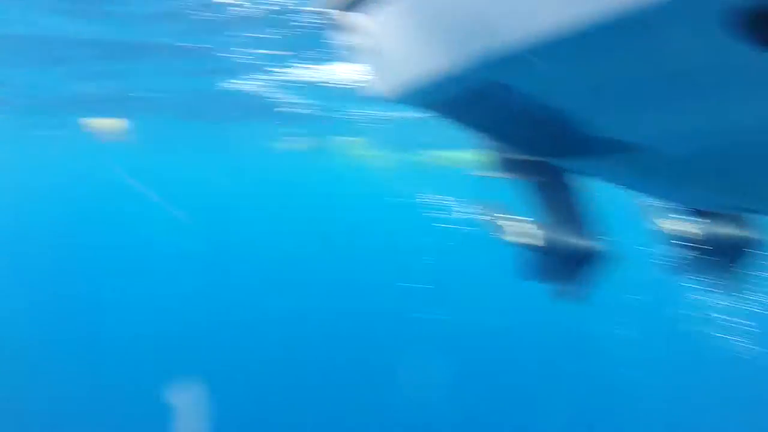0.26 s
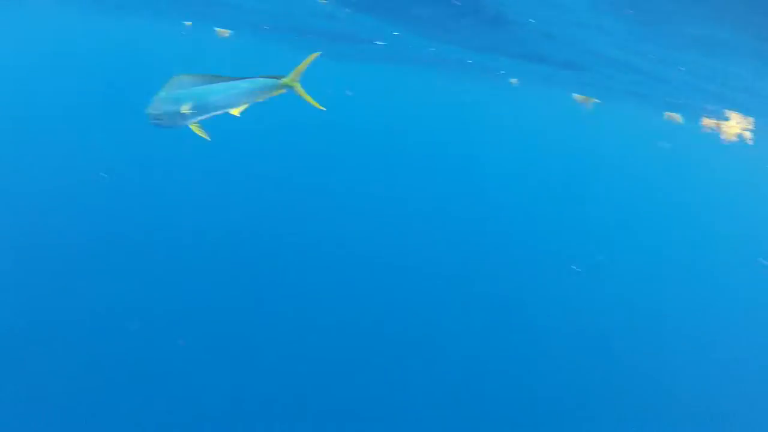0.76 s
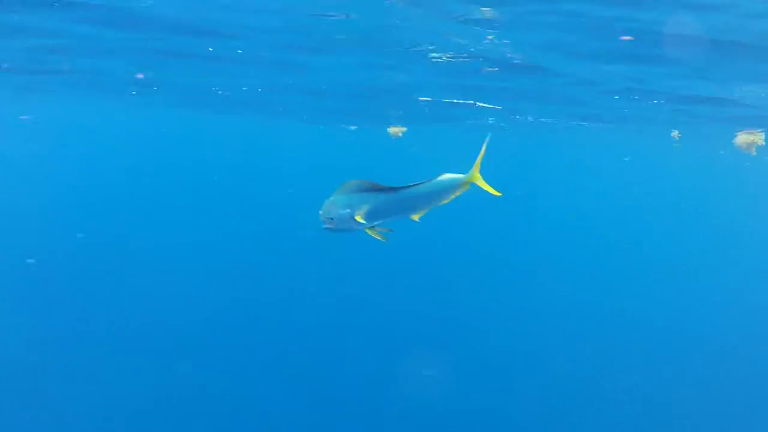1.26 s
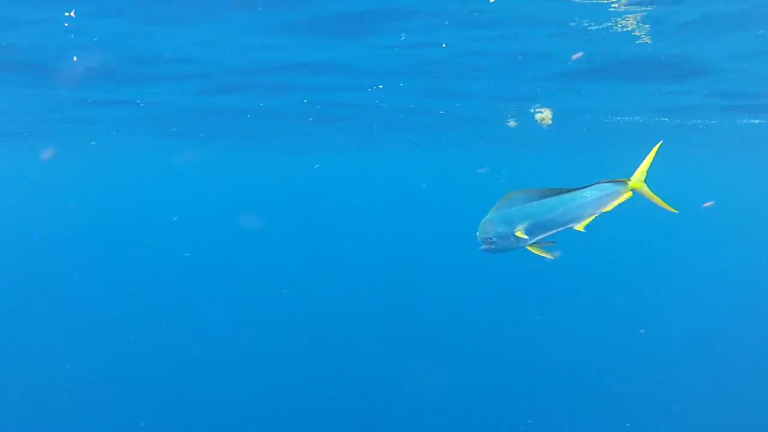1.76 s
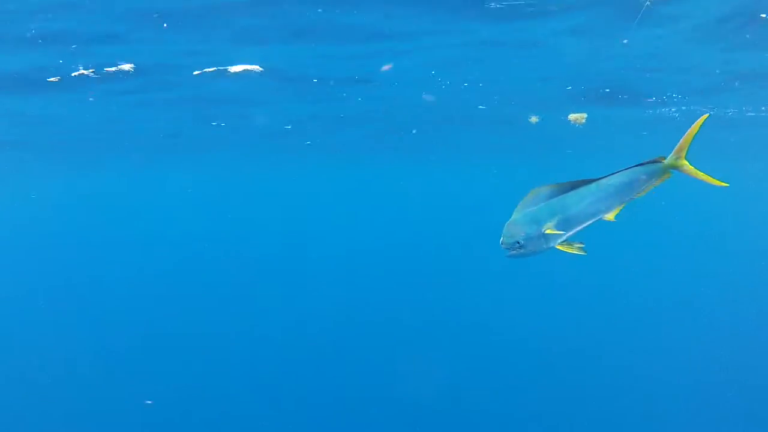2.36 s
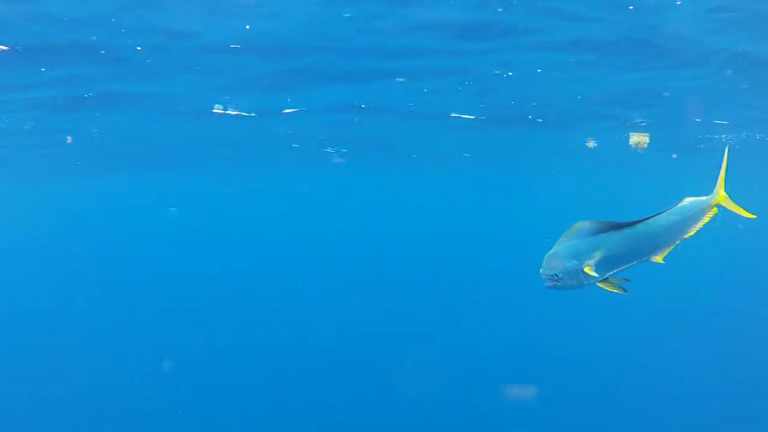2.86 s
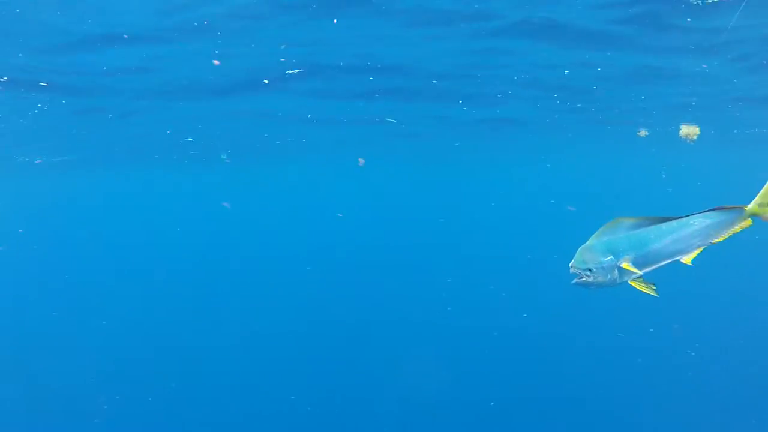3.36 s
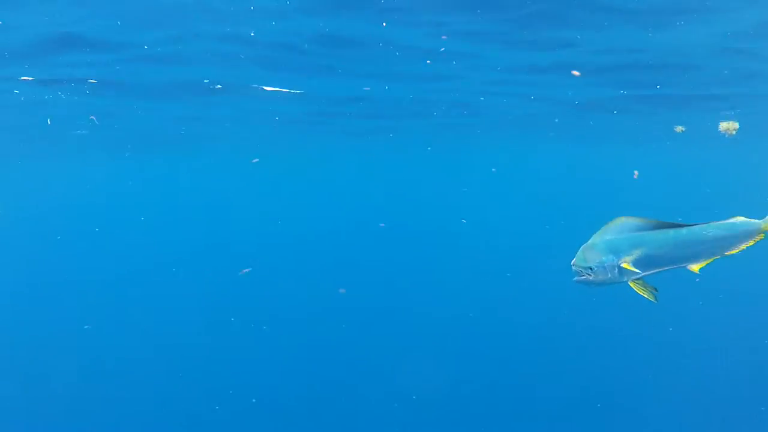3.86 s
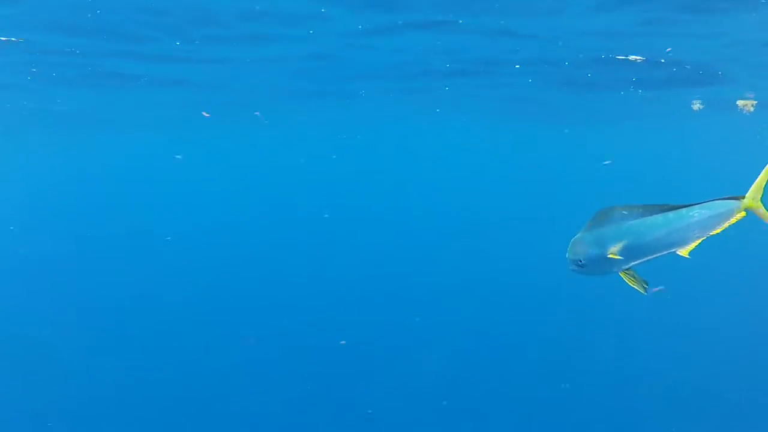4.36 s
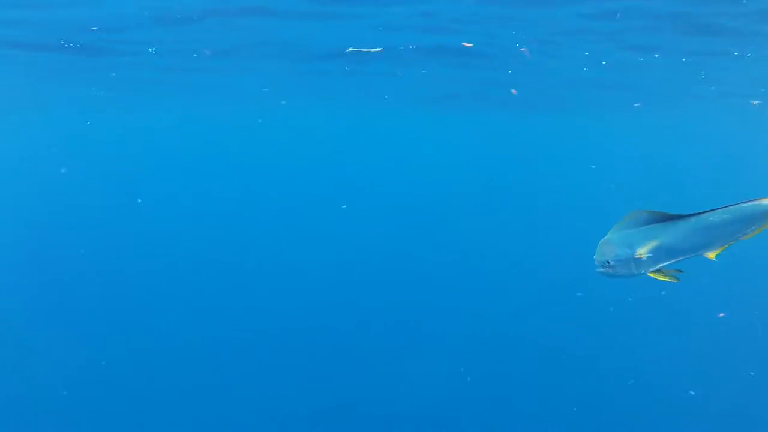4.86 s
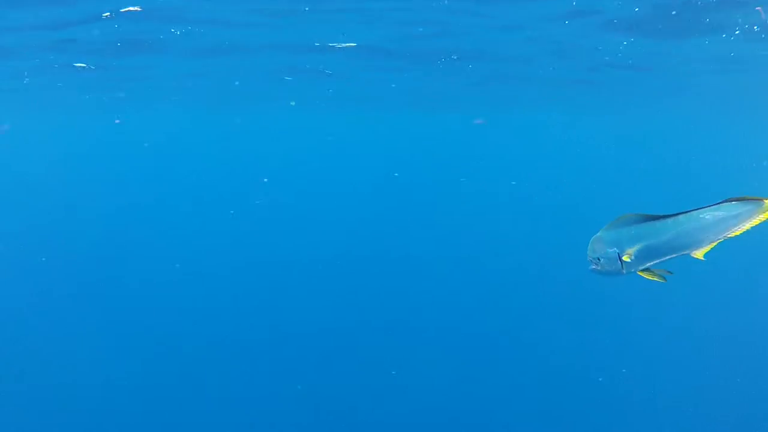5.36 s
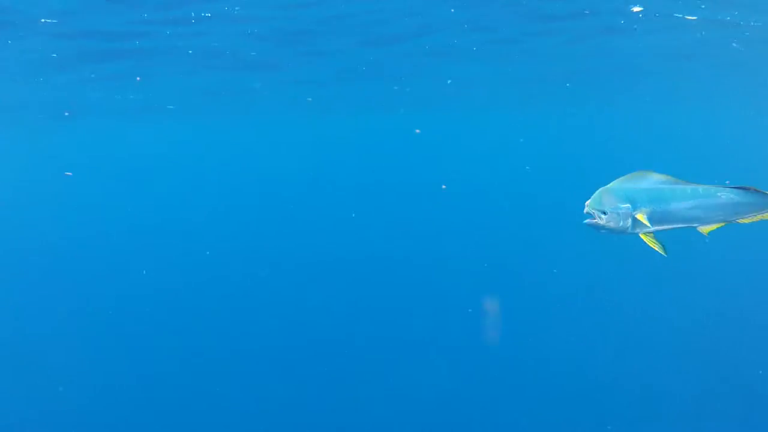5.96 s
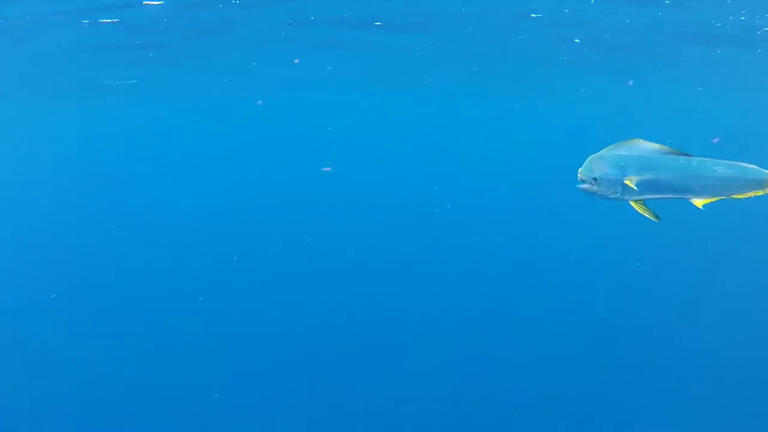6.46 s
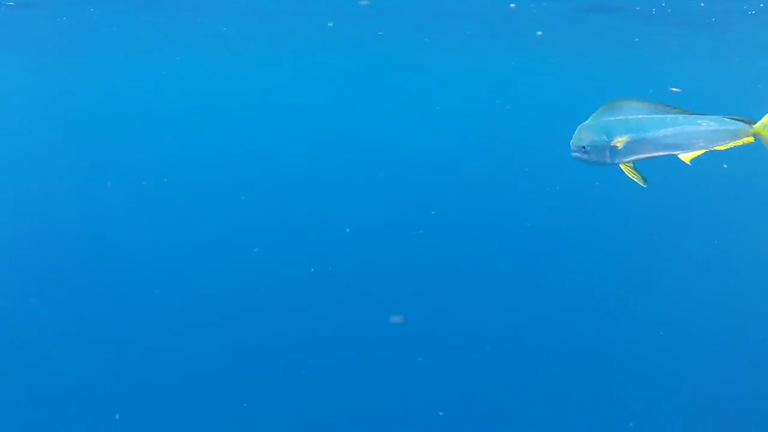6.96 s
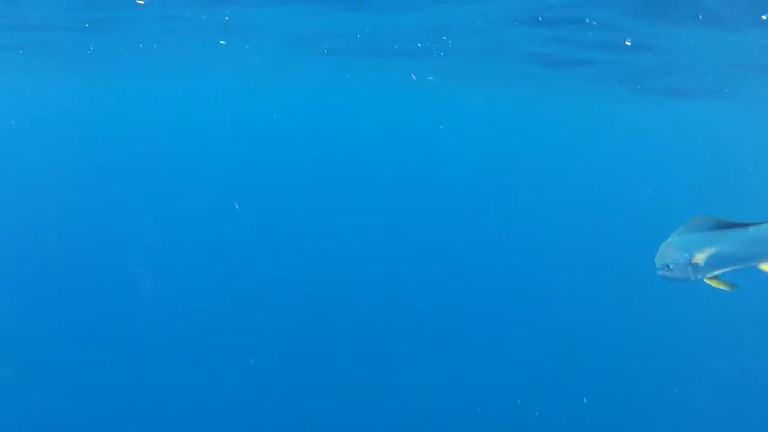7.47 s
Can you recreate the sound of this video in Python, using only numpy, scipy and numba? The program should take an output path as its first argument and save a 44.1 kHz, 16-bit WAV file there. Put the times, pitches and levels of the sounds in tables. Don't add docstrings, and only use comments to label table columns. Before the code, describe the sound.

A rough, close, slightly clipped underwater capture with gritty mirrored treble. Water shoves the pole in deep booming bursts and the clamp groans; the shell bangs and clicks, spray and froth fizz. Bubbles glug out over the next second and thin away. The open sea remains as a steady dull hiss with soft hollow swells, before the pole stirs again and the housing knocks sharply.

```python
import sys
import numpy as np
from scipy import signal
from scipy.fft import rfft, irfft
from scipy.io import wavfile
from scipy.ndimage import uniform_filter1d
from numba import njit

SR = 44100
rng = np.random.default_rng(int(sys.argv[2]) if len(sys.argv) > 2 else 0)


def pcm_store(signal):
    levels = np.round(np.clip(np.atleast_2d(signal), -1, 1) * 32767)
    wavfile.write(sys.argv[1], SR, levels.astype(np.int16).T)


def level_to_linear(level):
    exponent = np.asarray(level, float) / 20
    return 10 ** exponent


N = 340452


def unit(x):
    return x / np.sqrt(np.mean(x ** 2))


def lowpass(x, order, hz):
    return signal.sosfilt(signal.butter(order, hz, fs=SR, output="sos"), x)


def curves(table):
    s, *columns = np.transpose(table)
    t = np.arange(N) / SR
    gate = np.interp(t, [s[0] - 0.03, s[0], s[-1], s[-1] + 0.05], [0, 1, 1, 0])
    return gate, [np.interp(t, s, column) for column in columns]


def walk(rate):
    hold = int(SR / rate)
    steps = np.repeat(rng.standard_normal(N // hold + 1), hold)
    return 1.77 * uniform_filter1d(uniform_filter1d(steps, hold), hold)[:N]


def resonant(x, modes):
    f = np.fft.rfftfreq(N, 1 / SR)
    power = sum(level_to_linear(2 * db) / (1 + (2 * (f - hz) / width) ** 2) ** 2 for hz, width, db in modes)
    return unit(irfft(rfft(x) * np.sqrt(power), N))


@njit
def svf(x, hz, width):
    y, band, low = np.empty(len(x)), 0., 0.
    for i in range(len(x)):
        g, k = np.tan(np.pi * hz[i] / SR), width / hz[i]
        v = (band + g * (x[i] - low)) / (1 + g * (g + k))
        band = 2 * v - band
        low = low + 2 * g * v
        y[i] = k * v
    return y


@njit
def rings(s, size, hz, t60, rise, glide):
    out = np.zeros(N)
    for e in range(len(s)):
        start, length, phase = int(s[e] * SR), int(t60[e] * SR), 0.
        for i in range(max(start, 0), min(start + length, N)):
            age = (i - start) / SR
            phase += 2 * np.pi * hz[e] * (1 + glide * age / t60[e]) / SR
            swell = min(age * hz[e] / rise, 1.)
            out[i] += size[e] * swell * 1000. ** (-age / t60[e]) * np.sin(phase)
    return out


def bubble_cloud(count, lo_hz, hi_hz, cycles, scatter_db, glide):
    when, pitch, strength = rng.random((count, 3)).T
    hz = lo_hz * (hi_hz / lo_hz) ** pitch
    size = level_to_linear(scatter_db * np.minimum(-np.log(1 - strength), 3.2))
    return unit(rings(when * N / SR, size, hz, cycles / hz, 5.3, glide))


def fizz(table, gain_db, dull_hz, scatter_db, count):
    gate, columns = curves(table)
    crackle = bubble_cloud(count, lo_hz=780, hi_hz=4600, cycles=28, scatter_db=scatter_db, glide=0.1)
    return gate * level_to_linear(columns[-1] + gain_db) * unit(lowpass(crackle, 3, dull_hz))


def fading(table, fade_s, longer=0):
    return [(s, db, hz, fade_s * level_to_linear(-longer * db)) for s, db, hz in table]


def hits(table, ring_s, rise, spread, rattle_db, crack_db, crack_width, count, snap_db=-60):
    s, peak_db, hz, fade = np.transpose(table)
    ring = np.clip(fade, 0.008, ring_s)
    out = rings(s, level_to_linear(peak_db + 3.5), hz, ring, rise, 0.02)

    chance = np.clip(rng.standard_normal((len(s), count, 2)), -1.4, 1.4)
    late = rng.random((len(s), count)) ** 1.3
    for k in range(count):
        near_hz = np.clip(hz * np.exp(spread * chance[:, k, 0]), 60, 5400)
        near_db = peak_db + rattle_db + 3.5 * chance[:, k, 1] - 12 * late[:, k]
        near_db = near_db - 20 * np.maximum(np.log2(near_hz / 4000), 0)
        near_s = s + 0.33 * np.clip(fade, 0, 0.08) * late[:, k]
        out = out + rings(near_s, level_to_linear(near_db), near_hz, 0.74 * ring, rise, 0.02)

    start = (s * SR).astype(int)
    blows = np.zeros(N)
    blows[start] = level_to_linear(peak_db + crack_db)
    latest = np.maximum(np.searchsorted(start, np.arange(N), "right") - 1, 0)
    latest_hz = hz[latest]

    def noise_burst(decay_s):
        return signal.lfilter([1], [1, -np.exp(-1 / (decay_s * SR))], blows) * rng.standard_normal(N)

    crack = svf(svf(noise_burst(0.0033), latest_hz, crack_width), latest_hz, crack_width)
    snap = svf(noise_burst(0.0012), latest_hz, 2600.)
    return out + level_to_linear(snap_db - crack_db) * snap + crack * np.sqrt(SR / crack_width)


# peak time in seconds, pole
# shudder in dB, clamp groan in dB, time to fall 20 dB in seconds.
WATER_SHOVES = [(0.01, -34, -47, 0.5), (0.215, -17, -24, .2), (0.245, -9, -23.5, 0.1),
                (0.355, -15, -18, 0.05), (0.465, -11.5, -22, 0.27), (0.525, -9, -19, 0.19),
                (0.575, -1, -29, 0.12), (0.679, -6.5, -37, 0.17), (0.79, -12.5, -51, .2),
                (0.9, -14, -41, 0.27), (0.985, -28, -21.5, 0.13), (1.145, -20, -32, 0.81),
                (1.66, -24.5, -29, 0.2), (1.75, -34, -33, 0.18), (1.88, -26, -43, .14),
                (2.02, -24.5, -32.5, 0.16), (2.14, -25.5, -51.5, 0.86), (2.38, -28, -63, 0.67),
                (2.57, -22, -62, 0.38), (3.42, -33, -66, 0.7), (4.03, -37, -66, 0.5),
                (4.925, -31.5, -58, 0.2), (5.275, -39, -65, 0), (6.6, -37.5, -64, 1.5),
                (7.265, -30, -55, .08), (7.37, -27, -37, 0.2), (7.5, -19, -33, 0.14), (7.6, -25, -40, .3),
                (7.676, -30, -24, 0)]


def jolted(column, stretch, calm_db):
    t, power = np.arange(N) / SR, level_to_linear(2 * calm_db)
    rise_s = 0.064
    for row in WATER_SHOVES:
        age = t - row[0]
        slope = np.maximum(age / (stretch * row[-1]), -age / rise_s)
        power = power + level_to_linear(2 * (row[column] - 20 * slope))
    return 10 * np.log10(power)


def pole():
    shudder_db = jolted(column=1, stretch=0.96, calm_db=-42)
    groan_db = jolted(column=2, stretch=0.73, calm_db=-64.5)
    eddies = rng.standard_normal((3, N))
    bend = resonant(eddies[0], [(55.1, 14, 0)])
    bend = unit(bend / (0.49 + np.abs(signal.hilbert(bend))) ** 0.62)
    rest = resonant(eddies[1], [(82.8, 20, 3.5), (27, 9, -1.5)])
    groan = resonant(eddies[2], [(223.8, 32, 0), (255.0, 53, -2.0), (135.6, 35, -5)])
    groan = groan * level_to_linear(1.95 * walk(25))
    return level_to_linear(shudder_db) * (bend + level_to_linear(-8.5) * rest) + level_to_linear(groan_db) * groan


# start in seconds, peak level in dB, ring in Hz.
SHELL_KNOCKS = [(0.0525, -29, 600), (0.2072, -19.5, 534), (0.311, -14.5, 520), (0.3231, -6, 474),
                (0.3351, -8.5, 500), (0.345, -13, 540), (0.3613, 0, 581), (0.3782, -16, 600),
                (0.4475, -9.5, 566), (0.4905, -17, 524), (0.5688, -17, 570), (0.9326, -24.5, 600),
                (0.9744, -6.5, 640), (0.9902, 5.5, 600), (1.0066, -8.5, 500), (1.0666, -18, 484),
                (1.1388, -20, 600), (1.1685, -7, 573), (1.1878, 0, 540), (1.2021, -17, 584),
                (1.2713, -14.5, 626), (1.35, -23, 520), (1.3733, -13.5, 575), (1.3985, -14, 480),
                (1.6259, -20.5, 493), (1.655, -17, 508), (1.6778, -17, 527), (1.72, -18, 554),
                (1.7417, -12, 568), (1.7861, -20.5, 561), (1.815, -25, 560), (1.852, -30, 568),
                (1.885, -29, 572), (1.914, -24, 578), (1.961, -25.5, 590), (2.0316, -25, 600),
                (2.0677, -18, 608), (2.128, -34, 640), (2.2, -38, 752), (7.6685, -9, 480)]


def knocks():
    blows = fading(SHELL_KNOCKS, fade_s=0.0251, longer=0.42)
    return hits(blows, ring_s=0.092, rise=1.33, spread=0.477, rattle_db=-22.0,
                crack_db=-34, crack_width=390.0, count=3)


# start in seconds, peak level in dB, ring in Hz.
SINKING_TICKS = [(0.0983, -18.5, 2200), (0.1083, -22.5, 1770), (0.1367, -27, 1940), (0.2065, -14.5, 2500),
                 (0.2883, -23, 2000), (0.309, -7, 2250), (0.3237, -27, 1340), (0.3345, -16, 1360),
                 (0.3423, -21, 1370), (0.3502, -11, 1350), (0.3609, -3.5, 1350), (0.3741, -9.5, 2490),
                 (0.3832, -2.5, 2310), (0.394, -30, 1600), (0.4069, -19, 3900), (0.416, -29.5, 1900),
                 (0.4318, -27.5, 2326), (0.4411, -25.5, 2580), (0.4511, -23, 1640), (0.458, -20, 1574),
                 (0.5636, -36, 1500), (0.6652, -25, 1740), (0.8251, -19.5, 1575), (0.9034, -17.5, 1810),
                 (0.9727, -27.5, 2010)]
# start in seconds, peak level in dB, ring in Hz, fade time in seconds.
CLAMP_TICKS = [(7.4482, -34, 2310, 0.004), (7.5326, -23.5, 3240, 0.013), (7.5698, -22, 3830, 0.013),
               (7.6149, -27, 3500, .008), (7.616, -25, 1470, 0.012), (7.622, -15.5, 3800, 0.014),
               (7.623, -33, 1400, 0.019), (7.6673, -2, 2300, 0.00535), (7.6734, -21, 3720, 0.019),
               (7.6784, -15, 2000, 0.013), (7.6802, -17, 3470, 0.017), (7.6998, -30, 1940, 0.01)]


def plastic_ticks():
    ticks = fading(SINKING_TICKS, fade_s=0.017) + CLAMP_TICKS
    return hits(ticks, ring_s=0.027, rise=1.26, spread=0.27, rattle_db=-12,
                crack_db=-13.5, crack_width=900.0, count=5, snap_db=-12)


# time in seconds, pitch of the pocket in Hz, level in dB.
AIR_POCKET = [
    (0.98, 552, -21),
    (1.104, 490, -29.5),
    (1.19, 468, -21),
    (1.33, 448, -38),
    (1.47, 504, -27.5),
    (1.59, 505, -39),
    (1.73, 547, -22.5),
    (1.92, 569.5, -29.5),
    (2.2, 654, -54),
]


def pocket():
    gate, (hz, level_db) = curves(AIR_POCKET)
    pops = rng.standard_normal(N) * level_to_linear(3.2 * walk(60.03))
    hz = hz * (1 + 0.015 * walk(14))

    def sing(ratio, width):
        return unit(svf(svf(pops, ratio * hz, width), ratio * hz, 4.0 * width))

    upper_modes = [(1.3, -27), (1.55, -12.5), (1.9, -17.5), (2.7, -14)]
    upper = sum(level_to_linear(db) * sing(ratio, 35.0) for ratio, db in upper_modes)
    return gate * level_to_linear(level_db - 3.0) * (sing(0.98, 15.0) + upper)


# start in seconds, peak level in dB, ring in Hz.
SQUEEZE_TICKS = [(0.9891, -18, 1195), (1.042, -30.5, 2280), (1.0572, -29.5, 1930), (1.085, -28, 1250),
                 (1.1009, -18, 1320), (1.1036, -15.5, 1420), (1.1124, -22.5, 1393), (1.1462, -22.5, 1810),
                 (1.1525, -23, 1950), (1.1675, -17.5, 2282), (1.1873, -12.5, 3470), (1.2008, -24, 1900),
                 (1.217, -23.5, 2400), (1.23, -26.5, 1290), (1.2426, -21.5, 1380), (1.2588, -27, 1374),
                 (1.277, -22, 1390), (1.3086, -28, 1370), (1.3258, -13.5, 1530), (1.3571, -21.5, 1220),
                 (1.371, -21.5, 1480), (1.3989, -25, 1550), (1.4527, -24, 1280), (1.4676, -22.5, 1390),
                 (1.4933, -26.5, 1500), (1.567, -29.5, 1280), (1.588, -32, 1470), (1.631, -27.5, 2365),
                 (1.6849, -27, 1339), (1.71, -30, 1400), (1.7417, -25.5, 1280), (1.7865, -27, 2020),
                 (1.891, -32, 1490), (1.9141, -21.5, 1480), (1.945, -31, 1350), (1.9614, -20, 1330),
                 (2.0359, -30, 1333), (2.0676, -28, 1740), (2.069, -29, 2250), (2.117, -39, 1650),
                 (2.227, -37, 1290), (2.245, -37, 1500)]


def squeeze_ticks():
    return hits(fading(SQUEEZE_TICKS, fade_s=0.027), ring_s=0.03, rise=1.5, spread=0.3, rattle_db=-9,
                crack_db=-12.5, crack_width=730.0, count=7, snap_db=-20)


# start in seconds, peak level in dB, ring
# in Hz, fade time in seconds.
SINGLE_RINGS = [(.293, -29.5, 5200, .012), (.456, -19, 400.4, .2), (.5, -21, 396, .19),
                (.933, -25, 1030, 0.048), (1.03, -23.5, 444, .15), (1.205, -19, 429, 0.13),
                (1.225, -22.5, 645, 0.17), (1.326, -16.5, 1257, .05), (1.63, -25.5, 980, 0.044),
                (1.709, -15, 552, 0.13), (1.84, -34, 864, .17), (1.868, -42.5, 4500, .013),
                (1.97, -33.5, 2800, .015), (2.068, -25, 960, 0.0316), (2.145, -49, 3950, .012),
                (7.476, -32.5, 860, 0.02), (7.668, -12, 1690, 0.025), (7.682, -18, 600, .03),
                (7.69, -24, 400, .06), (1.008, -22, 400, .1), (1.135, -18, 520, .06),
                (1.18, -15.5, 400, .06), (1.283, -20, 690, .05), (1.06, -29, 950, .1)]


def single_rings():
    return hits(SINGLE_RINGS, ring_s=0.2, rise=1.6, spread=0.184, rattle_db=-4.5,
                crack_db=-25, crack_width=720.0, count=2)


# time in seconds, fizz level in dB.
AIR_FROTH = [
    (0.98, -41.5),
    (1.104, -34),
    (1.35, -36.5),
    (1.55, -43),
    (1.7, -45.5),
    (1.95, -46),
    (2.1, -54),
    (2.25, -56),
    (2.4, -62),
]


def froth():
    return fizz(AIR_FROTH, gain_db=0.0, dull_hz=1900., scatter_db=4.5, count=5000)


# time in seconds, fizz level in dB.
PLUNGE_FOAM = [
    (0.205, -50),
    (0.216, -33),
    (0.254, -55.5),
    (0.364, -24),
    (0.385, -29),
    (0.392, -50),
    (0.44, -48),
    (0.455, -31),
    (0.56, -38),
    (0.68, -53),
]


def foam():
    return fizz(PLUNGE_FOAM, gain_db=2.5, dull_hz=1200., scatter_db=5.5, count=9000)


# start in seconds, length in seconds, level in dB, brightness in Hz.
SPRAY_SHEETS = [(0.302, 0.027, -30, 1502), (0.37, 0.0284, -31, 3000), (0.398, 0.099, -40, 3500),
                (1.138, 0.0204, -38.5, 2020), (1.159, 0.02, -24.5, 4040), (1.173, 0.018, -23.5, 4510),
                (1.218, 0.037, -32, 2535), (7.667, 0.013, -19.5, 3200), (0.454, 0.0517, -33, 1200),
                (0.534, 0.041, -29.5, 1200), (7.6148, 0.0038, -27, 3300), (7.69, .014, -41, 2600),
                (1.1, 0.011, -31, 3190), (1.033, 0.036, -38, 2400), (1.629, 0.013, -38, 1800),
                (2.033, .012, -43, 2400), (2.065, 0.013, -39, 1900)]


def spray():
    t, out = np.arange(N) / SR, 0
    drops = bubble_cloud(12000, lo_hz=500, hi_hz=5800, cycles=11.8, scatter_db=2.5, glide=-0.052)
    for s, length, db, hz in SPRAY_SHEETS:
        corners = s + length * np.array([0, 0.08, 0.8, 1.5])
        gate = np.interp(t, corners, [0.0016, 0.91, 0.97, 0.0015])
        out = out + gate * level_to_linear(db) * unit(lowpass(drops, 2, hz))
    return out


# start in seconds, peak level in dB, ring in Hz, fade time in seconds.
HIGH_PINGS = [(0.1371, -35.5, 3640, 0.0265), (0.2882, -23, 3133, 0.0115), (0.2931, -29.5, 3250, 0.011),
              (0.3605, -24, 3620, 0.019), (0.3732, -26, 3490.0, 0.044), (0.3831, -24, 3870, 0.0088),
              (0.4143, -20.5, 3160, 0.0095), (0.4261, -33.5, 4480, 0.014), (0.4472, -28, 3200, 0.011),
              (0.4573, -30.5, 4600, 0.016), (0.5002, -30, 4330, 0.017), (0.9032, -29.5, 3685, 0.018),
              (0.9911, -28, 3030, 0.012), (1.1179, -30.5, 3300, 0.017), (1.1688, -17.5, 3772, 0.036),
              (1.5635, -38, 3830, 0.012), (2.0287, -39, 3150, 0.01), (2.0668, -39, 3374, 0.013),
              (7.4484, -31, 3665, 0.0082), (7.67, -28, 5200, .02), (0.716, -44, 5200, 0.0092),
              (0.841, -41, 5200, .012), (0.8842, -34, 3900, 0.012), (0.944, -42, 3330, .01),
              (0.9655, -41, 3000, .01), (1.1002, -24, 2820, 0.02), (1.2289, -37, 3500, .014),
              (1.2753, -35.5, 3500, .014), (1.3042, -32, 2850, 0.02), (1.7442, -39.5, 3580, 0.015),
              (1.903, -45.5, 3500, .012), (2.2, -48, 3600, .01), (2.2, -52, 5400, .01)]


def pings():
    return hits(HIGH_PINGS, ring_s=0.02, rise=3.6, spread=0.27, rattle_db=-6,
                crack_db=-15.5, crack_width=3000.0, count=2)


# start in seconds, peak
# level in dB, ring in Hz, fade time in seconds.
POLE_THUMPS = [(.334, -26, 178.6, 0.062), (.981, -22.5, 124, 0.048), (2.003, -25, 130, 0.072),
               (.33, -17, 86, 0.13), (.65, -17, 82, 0.21), (1.245, -19.5, 90, 0.16), (1.43, -28, 88, .15),
               (1.67, -23, 80, 0.21), (2.008, -25, 88, .15), (4.918, -41.5, 120, 0.04),
               (5.912, -36, 250, .04), (7.361, -27, 127, 0.074), (7.486, -32, 142, 0.092)]


def thumps():
    return hits(POLE_THUMPS, ring_s=0.22, rise=0.59, spread=0.28, rattle_db=-8,
                crack_db=-23, crack_width=150., count=3)


# start in seconds, peak level in dB, ring in Hz, fade time in seconds.
FAR_GULPS = [(3.0949, -27, 476, 0.047), (3.4293, -27.5, 500.0, 0.1), (3.6022, -27, 496, 0.051),
             (3.7926, -33.5, 500.0, 0.118), (3.9782, -28.5, 555, 0.041), (5.1567, -29.5, 467, 0.092),
             (5.5127, -33, 480.0, 0.11), (5.9126, -26.5, 600.0, 0.037), (6.2604, -27, 580, 0.0389),
             (6.4817, -25.5, 600.0, 0.065), (6.6053, -27, 532, 0.027), (7.2087, -23, 478, 0.029),
             (7.4757, -16, 540, 0.021)]


def gulps():
    return hits(FAR_GULPS, ring_s=0.0935, rise=2.9, spread=0.148, rattle_db=-15.5,
                crack_db=-39, crack_width=180.0, count=2)


# peak time in seconds, half length in seconds, lift of the lowest hollow mode in dB.
SEA_SWELLS = [
    (0.297, 0.2, 14),
    (0.75, 0.18, 3.5),
    (1.148, .15, 4.5),
    (2.502, 0.28, 4.5),
    (3.506, 0.56, 12.5),
    (5.453, 0.5, 12.5),
    (7.413, 0.51, 11.5),
]
# time in seconds, level in dB.
HOLLOW_STIR = [(0.0, -43), (0.38, -34), (0.395, -52), (0.44, -51), (0.452, -32), (0.66, -38), (0.75, -47),
               (0.99, -42), (1.14, -24.5), (1.27, -33.5), (1.44, -39.5), (1.87, -57)]


def lapping():
    t = np.arange(N) / SR
    swell_db = sum(db * np.exp(-((t - s) / half) ** 2) for s, half, db in SEA_SWELLS)
    gate, (stir_db,) = curves(HOLLOW_STIR)
    swell_share = 0.243
    upper = level_to_linear(2 * (-48.5 + swell_share * swell_db)) + gate * level_to_linear(2 * stir_db)
    return 10 * np.log10(upper), -61.5 + swell_db


# centre in Hz, width in Hz, level in dB.
HOLLOW_MODES = [
    (480, 134, -0.5),
    (600, 95, 2.5),
]


def slosh():
    level_db, lowest_db = lapping()
    blobs = bubble_cloud(900, lo_hz=323.7, hi_hz=701, cycles=19.0, scatter_db=3.0, glide=0.036)
    rush = rng.standard_normal((2, N)) * level_to_linear(1.03 * walk(30))
    upper = resonant(rush[0], HOLLOW_MODES) + level_to_linear(-7.5) * resonant(blobs, HOLLOW_MODES)
    lowest = resonant(rush[1], [(333.0, 66, 0)])
    return level_to_linear(level_db + 0.5) * upper + level_to_linear(lowest_db - 3.0) * lowest


# centre in Hz, width in Hz, level in dB.
WALL_MODES = [(165, 165, -2.5), (826.4, 55, -14), (994.3, 40, -9), (1304, 146.3, -2.5), (1486, 230, -0.5),
              (1961, 222, 1), (2095, 213, -2), (2482, 140, -7), (2696, 120, -11), (2864, 340, -17),
              (3160, 296, -12.5), (3687, 400, -16), (4830, 740, -28), (5550, 750, -35)]


def wash():
    level_db = -48.5 + 0.32 * walk(26)
    return level_to_linear(level_db) * resonant(rng.standard_normal(N), WALL_MODES)


def scene():
    shell = pole() + knocks() + plastic_ticks() + pings() + thumps()
    air = pocket() + squeeze_ticks() + single_rings() + froth()
    water = foam() + spray() + gulps() + slosh() + wash()
    return (shell + air + water)[None]


def band_limit(x):
    return signal.sosfilt(signal.butter(12, 15940, fs=SR, output="sos"), x)


def record(dry):
    slow_hz, hold = 12000, 4
    slow = signal.resample_poly(dry, slow_hz // 300, SR // 300, axis=1)
    held = np.repeat(np.clip(slow, -1, 1), hold, axis=1)
    mirrored = signal.resample_poly(held, SR // 300, slow_hz * hold // 300, axis=1)
    mirrored = np.pad(mirrored, ((0, 0), (0, 8)))[:, :N]
    top_filter = signal.ellip(7, 0.3, 30, 15300, fs=SR, output="sos")
    mix = signal.sosfilt(top_filter, mirrored)
    return band_limit(mix)


dry = scene()
out = record(dry)
pcm_store(out)
```